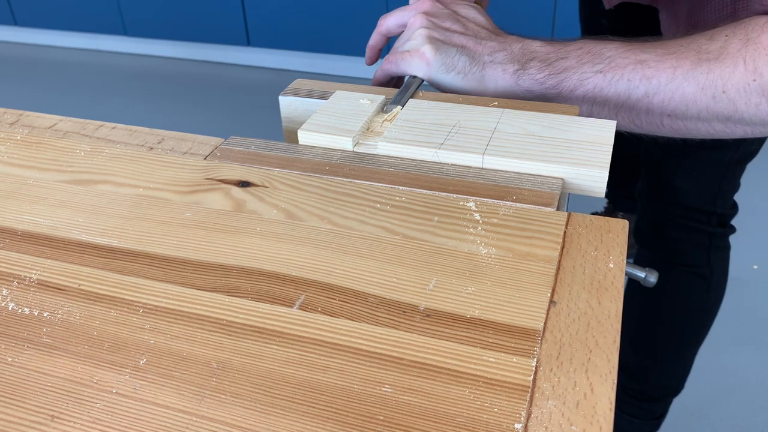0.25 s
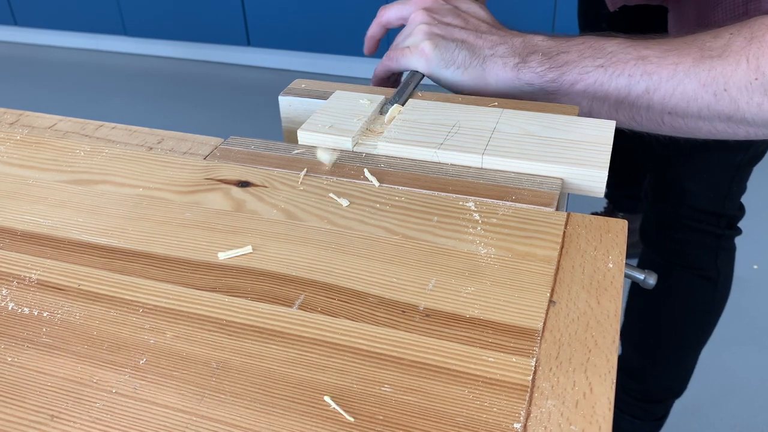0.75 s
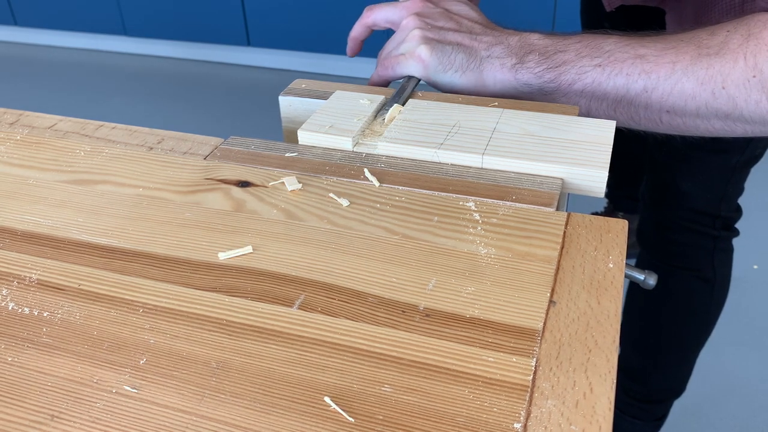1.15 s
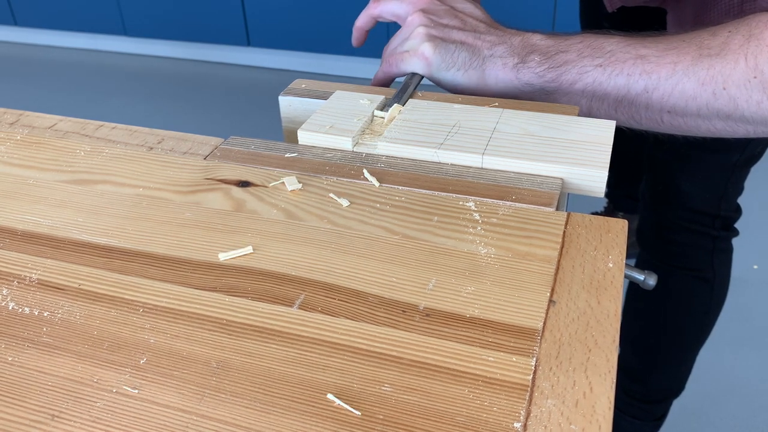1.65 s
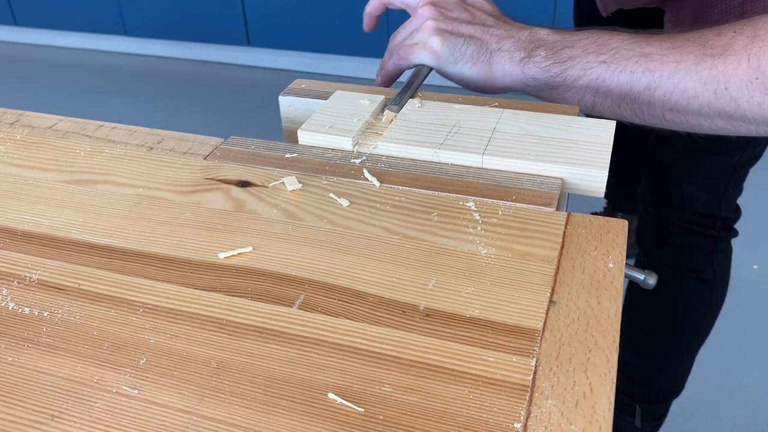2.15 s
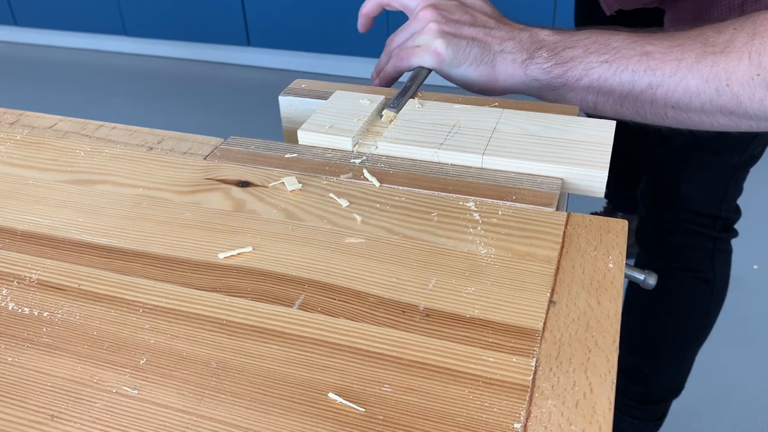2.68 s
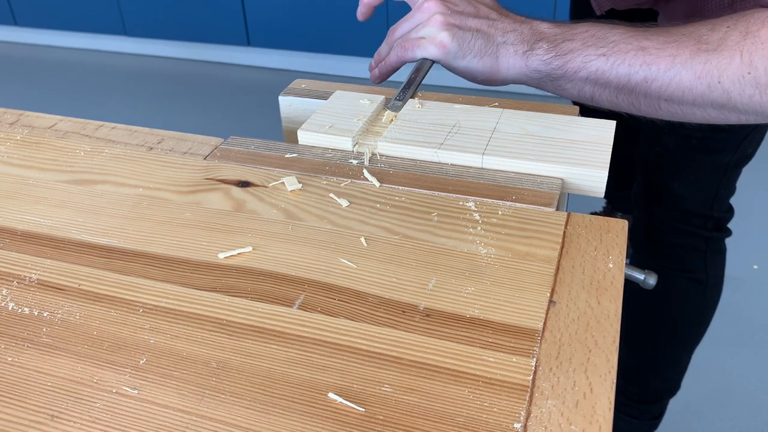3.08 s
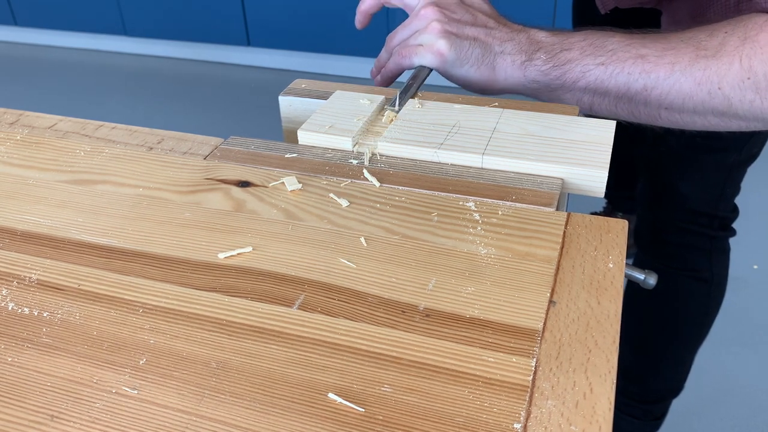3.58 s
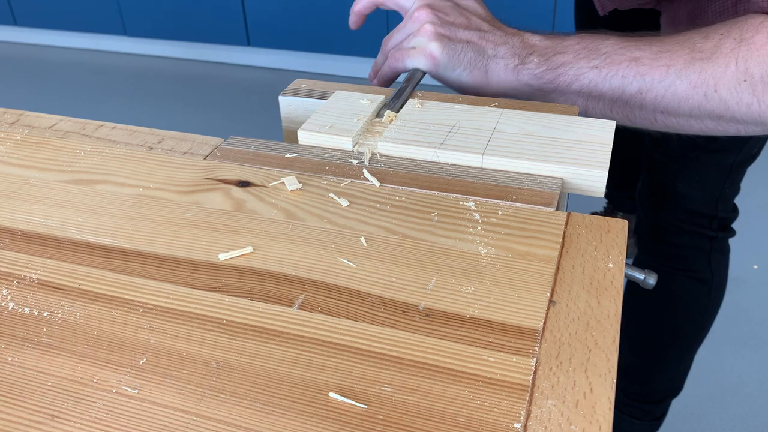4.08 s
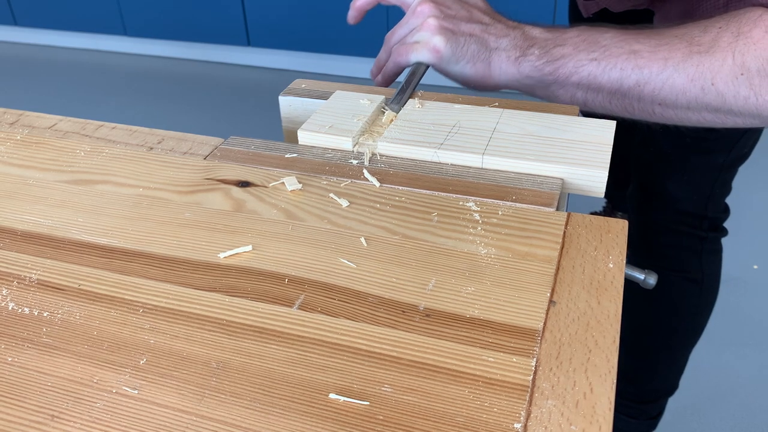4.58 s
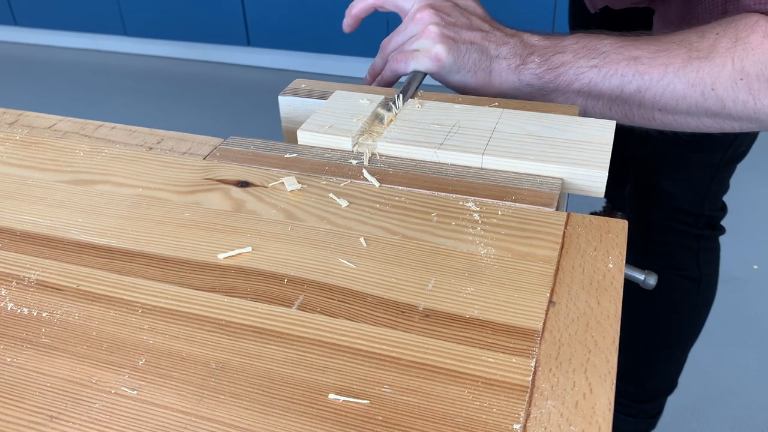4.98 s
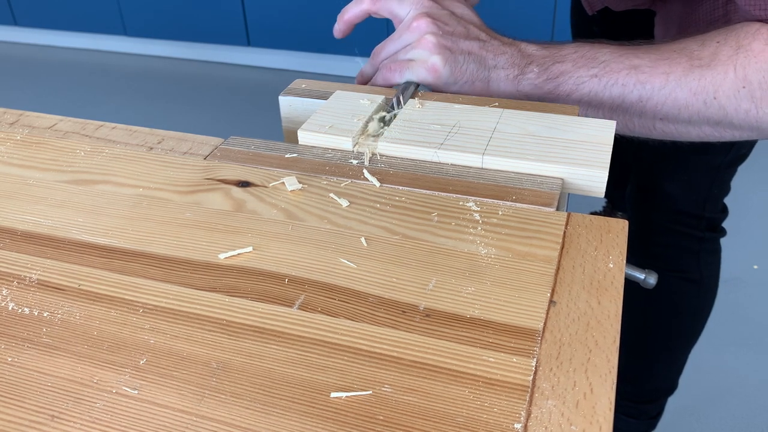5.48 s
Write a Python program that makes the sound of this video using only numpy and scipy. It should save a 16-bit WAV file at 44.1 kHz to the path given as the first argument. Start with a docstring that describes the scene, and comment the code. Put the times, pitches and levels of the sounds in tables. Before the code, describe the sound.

A hand chisel pares softwood in quick, crunchy scraping cuts with snapping fibres and soft bench thumps, pausing briefly before resuming, close and dry.

```python
"""A hand chisel pares a softwood block in a bench vice, heard in stereo close by on the bench (5.74 s).
Quick pushes tear fibres (grainy hiss), ring the block near 1.5 kHz and shake the bench top in low modes;
single fibres snap as clicked noise puffs. A squeak falls at 0.86 s and the hardest snap comes near 1.76 s.
After 3.0 s the tool nearly rests; from 3.55 s the cuts resume to the end, with a second squeak at 5.55 s.
A short decaying noise tail answers the tool as the room, over the steady shaped noise of quiet air."""
import sys
import numpy as np
from scipy import signal
from scipy.fft import rfft, irfft, next_fast_len
from scipy.io import wavfile
from scipy.ndimage import uniform_filter1d, map_coordinates

SR = 44100
rng = np.random.default_rng(int(sys.argv[2]) if len(sys.argv) > 2 else 0)


def persist_wave(psi):
    """Save psi, clipped to +-1, as 16-bit WAV."""
    counts = np.round(np.clip(psi, -1, 1) * 32767).astype(np.int16)
    wavfile.write(sys.argv[1], SR, np.atleast_2d(counts).T)


N = 253089


def chisel():
    """Source-filter principle: stick-slip cuts, slides and snaps excite block, blade and torn fibres."""
    # cuts, one row a push; levels are relative drives: [t/s, length/s, block level at the bite/dB,
    # block level at the break/dB, blade level above block/dB, tearing level above block/dB]
    cut_rows = [(0.052, 0.04, -42, -50, -13, -14), (0.145, 0.0061, -33, -16.5, -9, -12),
                (0.248, .022, -29, -42, -9, -16.5), (0.344, 0.024, -29.5, -19, -7.5, -1.5),
                (0.439, 0.028, -47, -26.5, -3.5, -8.5), (0.508, 0.075, -46, -20.5, -7.5, -11),
                (.688, .005, -30, -39, -17, -11.5), (0.722, 0.017, -30, -25, -22, -3.5),
                (.796, 0.028, -23, -23, -7, -14.5), (0.942, 0.046, -36.5, -32.5, -15, -10),
                (1.046, 0.0046, -30, -26, -6.5, -18), (1.217, .005, -29.5, -40, -20, -6),
                (1.273, 0.031, -37, -26.5, -1, -1.5), (1.395, 0.068, -40.5, -40, -7.5, -5),
                (1.489, 0.047, -31.5, -22.5, -2.5, 1), (1.617, 0.025, -36.5, -38.5, -4, -12.5),
                (1.716, 0.036, -42, -25.5, -4.5, -9), (1.755, 0.012, -10.5, -16, -22.5, -14),
                (1.865, 0.065, -45, -44.5, -31, -1.5), (2.131, .04, -29.5, -35.5, -7.5, -13.5),
                (2.234, 0.042, -36, -30, -7.5, -5), (2.373, 0.048, -30, -34.5, -12, -16),
                (2.47, 0.039, -29, -37.5, -10.5, -1.5), (2.627, 0.047, -72, -57, -11.5, 6),
                (2.763, 0.013, -43.5, -48.5, -6, -15), (2.892, 0.047, -55, -49.5, -3, 0.5),
                (2.958, .004, -29, -35.5, -5, -8), (2.986, .031, -48, -41, -6, -8),
                (3.551, 0.058, -37, -34.5, 0.5, -2), (3.673, 0.028, -38.5, -37.5, -4.5, -3),
                (3.77, 0.0185, -34, -35, -3, -3), (3.984, .056, -30.5, -29.5, -4.5, -5.5),
                (4.087, .048, -39, -35.5, -7, -4), (4.193, .068, -26.5, -29.5, -1.5, -9),
                (4.328, 0.045, -34.5, -33.5, -4, -4), (4.432, 0.0495, -24, -29, -6.5, -7),
                (4.576, 0.04, -32, -28, -12.5, -10), (4.665, 0.041, -34.5, -32, -4.5, -4),
                (4.911, .038, -50, -11, -10, -11.5), (4.968, .03, -23, -25.5, 0, 5),
                (5.034, 0.054, -47, -38, -8, 2.5), (5.139, 0.036, -47, -35, -1.5, -6),
                (5.188, 0.043, -15, -18.5, -7, 5), (5.307, 0.013, -48.5, -28.5, 7, 13.5),
                (5.408, 0.028, -17, -30.5, -4.5, -6.5), (5.539, 0.057, -48, -48, -5, -1.5),
                (5.609, 0.0043, -7, -19, -14, -25.5), (5.675, 0.033, -26.5, -23.5, -8.5, -9)]
    # light sliding of the blade on the wood between cuts: [t/s, block level/dB, tearing level/dB]
    slide_rows = [(0, -37, -43.5), (.19, -49, -72), (.55, -34.5, -49), (.78, -59, -48.5), (.9, -50, -51.5),
                  (1.3, -53, -65), (1.66, -50, -54.5), (2.05, -49, -55.5), (2.24, -76, -53.5),
                  (2.6, -45, -50.5), (2.97, -50.5, -55.5), (3.06, -68, -72.5), (3.25, -70.5, -71),
                  (3.55, -90, -86.5), (3.72, -71, -63), (4.0, -75, -90), (4.2, -51, -53.5), (4.9, -57, -66),
                  (5.1, -46, -55), (5.55, -43.5, -47.5), (5.74, -65, -64)]
    # snaps of single fibres, relative drives: [t/s, block level/dB, crack level above block/dB]
    snap_rows = [(0.1516, -21.5, -9.5), (0.3533, -15, -16), (0.3581, -10.5, -4), (0.3754, -26.5, 8),
                 (0.449, -22.5, -18), (0.5516, -26.5, -11), (0.5818, -17.5, -4.5), (0.5898, -20, 2),
                 (0.603, -18.5, -3), (0.7183, -31, -23), (0.808, -16, -12), (0.829, -21, -14),
                 (0.8428, -32.5, 7.5), (0.9725, -33.5, -16.5), (1.0068, -30.5, -31), (1.0513, -17.5, -13),
                 (1.092, -42, -1), (1.226, -40.5, 2.5), (1.287, -17, -6.5), (1.2956, -16.5, -5.5),
                 (1.306, -24, 3.5), (1.4176, -19, -10), (1.487, -15.5, -12), (1.5182, -12, -12),
                 (1.7208, -32, -12), (1.735, -20, -8), (1.7557, 0, -13), (1.7694, -10, -14),
                 (2.135, -25, -9), (2.146, -26.5, -15), (2.171, -28, -12.5), (2.2424, -26.5, -5),
                 (2.271, -24.5, -22.5), (2.334, -49.5, 5), (2.372, -22.5, -16), (2.3858, -27, -11),
                 (2.411, -28, -22), (2.468, -28.5, -8.5), (2.4883, -22.5, -2), (2.6701, -32, -2.5),
                 (2.752, -30, -20), (2.9559, -26, -22), (2.9875, -34.5, -20), (3, -29.5, -8),
                 (3.016, -25.5, -11), (3.278, -40.5, -23), (3.3494, -33.5, -3.5), (3.5833, -22.5, -15.5),
                 (3.6051, -20.5, -23), (3.7029, -26.5, -29), (3.79, -32.5, -12), (3.897, -33, -38),
                 (3.9856, -21, -24), (4.006, -24, -9), (4.0326, -22.5, -2), (4.0921, -27, -9),
                 (4.115, -29, -13), (4.138, -22, -23.5), (4.197, -28, -4.5), (4.211, -12.5, -10),
                 (4.2365, -8.5, -14), (4.2617, -9.5, -7.5), (4.4348, -27, -9.5), (4.4589, -26.5, 3.5),
                 (4.4844, -23, -8), (4.5069, -27, -3), (4.565, -35, -4), (4.586, -19.5, -14),
                 (4.603, -34.5, 2.5), (4.6274, -24.5, -10.5), (4.6683, -28, -6), (4.6878, -23, -14),
                 (4.7072, -24, -18), (4.916, -28, -3.5), (4.9288, -17.5, -12), (4.9479, -13, -34),
                 (4.9574, -20.5, 0), (5.0921, -23, -31), (5.1913, -18, -2), (5.3184, -39, 1),
                 (5.4088, -13.5, -18), (5.4202, -27.5, -11), (5.4388, -26.5, -24), (5.4635, -27, -17.5),
                 (5.5851, -29, -25), (5.6114, -19.5, -18.5), (5.6355, -39.5, 7), (5.6798, -25.5, -12.5)]
    # modes of the wood block: [f/Hz, width/Hz, relative level/dB]
    block_modes = [(606, 170, -9.5), (1118, 21, -1.5), (1369.5, 67, 6.5), (1523, 163, 6.5), (1655, 130, 7),
                   (1757, 51, 7.5), (1901, 43, 2.5)]
    # modes of the blade: [f/Hz, width/Hz, relative level/dB]
    blade_modes = [(2710, 172, 3), (3404, 150, 1), (3860, 82, -3.5), (4662, 310, -3)]
    # spectrum of the tearing fibres: [f/Hz, relative density level/dB]
    tearing_spectrum = [(2000, -24), (4000, -8), (5500, -2.5), (7000, -3.5), (7800, -9), (9000, -2),
                        (10500, 2), (11500, -6.5), (12400, 1), (14000, -2), (15600, -19), (15850, -14),
                        (16000, -35.5)]
    bite_db_per_s, let_go_db_per_s = 3501.5, 953  # start of every cut, decay of the block drive
    growth_db, tear_let_go_db_per_s = 4, 850  # blade and tearing gain on the block, then linger
    lift_s, lift_db, lift_db_per_s = 0.044, -2, 703  # the blade lifts just before each bite

    # force envelopes of the cuts
    s, length, bite_db, break_db, blade_db, tear_db = np.transpose(cut_rows)
    block = strokes(s, length, bite_db, break_db, bite_db_per_s, let_go_db_per_s)
    blade = strokes(s, length, bite_db + blade_db - growth_db, break_db + blade_db,
                    bite_db_per_s, tear_let_go_db_per_s)
    tear = strokes(s, length, bite_db + tear_db - growth_db, break_db + tear_db,
                   bite_db_per_s, tear_let_go_db_per_s)

    # sliding weakens while the blade is lifted
    lifted = strokes(s - lift_s, lift_s, lift_db, lift_db, lift_db_per_s, bite_db_per_s)
    slide, slide_tear = amp(curves(slide_rows)) / (1 + lifted)

    # stick-slip gives way to steady tearing in a thick shaving
    ticking = slips(rate=170, spread_db=2, t60=0.022, steady=0.6)
    flowing = np.clip(uniform_filter1d(tear, size=SR // 30) / amp(-15.5), 0, .85)
    slip = flowing + (1 - flowing) * ticking

    s, snap_db, crack_db = np.transpose(snap_rows)
    knock = bursts(s, snap_db + 6.5, t60=0.0073, rise=0.0011, click=1.64)
    crack = bursts(s, snap_db + crack_db + 2.5, t60=0.019, rise=0.00027, click=0.44)

    rubbed = (1.007 * block + slide) * slip * grains(2.8, 500)
    wood = filtered(patchy(rubbed, depth_db=4), resonant(block_modes))
    # a snap starts all modes in step: a hard attack, here without its bass
    in_step = resonant(block_modes, ratio=0.88)
    wood = wood + filtered(knock, lambda hz: in_step(hz) * (1j * hz / (1j * hz + 700)) ** 2)

    rasp = (0.75 * blade + 0.47 * slide + 0.23 * slide_tear) * slip * grains(1.5, 760)
    steel_drive = patchy(rasp, depth_db=2.5) + 0.27 * knock + 0.41 * crack
    steel = filtered(steel_drive, resonant(blade_modes))

    torn = (1.125 * tear + 2.5 * slide_tear) * slip * grains(1.2, 1200)
    fibres = filtered(patchy(torn, depth_db=5.5) + crack,
                      lambda hz: unit(amp(along(tearing_spectrum, hz))))

    wood_ports = ports(wood, 1.0, -0.000058, -.2)
    steel_ports = ports(steel, 0.16, -0.000073, -1.4)
    return wood_ports + steel_ports + ports(fibres, 0.64, 0.0002844, -.2)  # tearing comes from the right


def slips(rate, spread_db, t60, steady):
    """Stick-slip friction: random sudden rises, rate a second, decay over a steady share; rms 1."""
    sizes = amp(spread_db * np.minimum(rng.exponential(size=N), 2.5))
    kicks = (rng.random(N) < rate / SR) * sizes
    decay = amp(-60 * np.arange(SR // 20) / SR / t60)
    fading = signal.fftconvolve(kicks, decay)[:N]
    return unit(steady + unit(fading))


def patchy(x, depth_db):
    """Time-varying spectrum: a smooth random gain makes each moment favour other pitches."""
    z = signal.stft(x, nperseg=256)[2]
    field = uniform_filter1d(rng.standard_normal(z.shape[1:]), 3, axis=0)  # smooth over frequency
    field = uniform_filter1d(field, 8, axis=1)  # smooth over time
    gain = amp(depth_db * (unit(field) - 0.3 * depth_db))  # deeper patches are also softer
    return signal.istft(z * gain, nperseg=256)[1][:, :N]


def squeaks():
    """Frequency modulation: a rough tone glides down and settles, as a chip springs free."""
    # thin squeaks: [t/s, start f/Hz, end f/Hz, length/s, level/dB]
    squeak_rows = [(0.862, 15850, 10080, 0.019, -17), (5.553, 14560, 11900, 0.0078, -20)]
    track = np.zeros(N)
    for s, from_hz, to_hz, length, db in squeak_rows:
        u = np.arange(round(length * SR)) / (length * SR)
        glide = to_hz + (from_hz - to_hz) * (1 - u) ** 2
        hz = glide + 900 * rng.standard_normal(len(u))  # roughness
        tone = np.sin(2 * np.pi * np.cumsum(hz) / SR)
        track[round(s * SR):][:len(u)] += amp(db) * np.sin(np.pi * u) * tone
    return ports(np.array([track, track]), 1, 3.02e-4, 0)


def bench():
    """Forced vibration of a plate: a lumpy hand force and single soft jolts ring the bench-top modes."""
    # shoves by the hands, relative drives: [t/s, jolt level/dB, second mode level above first/dB,
    # rocking level/dB, upper modes level above rocking/dB]
    jolt_rows = [(.043, -13, 3, -41, -28), (0.107, -10, -2, -54, -10), (.156, -25, 13, -39, 12),
                 (0.261, -17, 4.5, -31, -4), (0.353, -19, 3, -27.5, 5.5), (.433, -19, 11, -29.5, -4),
                 (.505, -14, 6, -18, 3.5), (.61, -11, -12, -17, -7.5), (0.699, -44, -14, -36, -26),
                 (0.817, -37, -23, -31, 0), (0.985, -24, -3.5, -44.5, -3.5), (1.045, -25, -7, -42, 2),
                 (1.124, -39, 17, -31, -25), (1.305, -15.5, -4, -25.5, 0), (1.376, -25, 10.5, -47, -13),
                 (1.444, -15.5, 8.5, -22.5, -10), (1.521, -29, -9, -24, 5), (1.608, -9.5, -6, -26.5, 3.5),
                 (1.736, -29, 12, -31, 3), (1.971, -23, 4, -25, -8.5), (2.03, -36, -8, -33.5, -27),
                 (2.256, -45, -7, -36.5, 0), (2.487, -47, -8, -35.5, 0.5), (2.544, -26, -8, -35.5, -12),
                 (2.776, -27.5, -15, -40, 0), (3.295, -42.5, -32, -44.5, -4.5), (3.351, -51, -4, -55, 10.5),
                 (3.589, -19, -13, -28, -0.5), (3.781, -32, -1, -41.5, 8), (3.881, -15, -3, -32.5, -17),
                 (3.931, -32.5, 12, -39, -8), (4.019, -18.5, -25, -22, -5.5), (4.215, -25, -1, -31, 2.5),
                 (4.257, -20, -24, -30, -17), (4.486, -16.5, 7.5, -17, -7), (4.603, -27, -4, -32.5, -6),
                 (4.708, -28, 12, -29.5, -1.5), (4.834, -24, 0, -56, -24), (4.94, -36, -12, -21, 0),
                 (5.172, -16.5, -4, -23.5, -24), (5.234, -30, -3, -39, 3), (5.349, -53, -7, -62, -18),
                 (5.417, -18, -17, -37.5, 9.5), (5.67, -25, 3, -24.5, -3.5)]
    # trembling resting weight of the hands: [t/s, rocking level/dB]
    lean_rows = [(0, -22.5), (.6, -41), (1.0, -44.5), (1.6, -43), (2.2, -47.5), (2.9, -51), (3.25, -60.5),
                 (3.5, -62), (3.8, -48.5), (4.4, -39), (4.9, -47), (5.3, -37), (5.74, -40.5)]
    # low, middle and upper bench modes: [f/Hz, width/Hz, relative level/dB]
    low_modes = [(61.4, 12, -12), (104.7, 10.7, -1.5)]
    middle_modes = [(124.1, 6, -3.5), (180.7, 16.8, -1.5)]
    upper_modes = [(265.7, 36, -7), (335.7, 20, 0.5), (412.4, 59.4, 2.5), (643, 31, 5.5), (860, 330, -0.5)]
    shove_db_per_s, shove_s = 903.5, 0.016  # rise and hold of a shove
    rock_db_per_s, upper_db_per_s = 152, 238  # decays
    lean_upper_db = -1.5

    s, jolt_db, second_db, rock_db, up_db = np.transpose(jolt_rows)
    lean = amp(curves(lean_rows)[0])
    shake = lean + strokes(s, shove_s, rock_db, rock_db, shove_db_per_s, rock_db_per_s)
    upper_db = rock_db + up_db
    rattle = amp(lean_upper_db) * lean
    rattle = rattle + strokes(s, shove_s, upper_db, upper_db, shove_db_per_s, upper_db_per_s)
    first = bursts(s, jolt_db - 8.0, t60=0.077, rise=0.0032, click=16)
    second = bursts(s, jolt_db + second_db - 0.5, t60=0.032, rise=0.01, click=8.2)

    # the main mode keeps rocking, its pitch wandering at random
    lumps = wobble(25)
    phase = 2 * np.pi * np.cumsum(low_modes[-1][0] + 7 * wobble(14)) / SR
    rocking = shake * amp(1.8 * lumps) * np.array([np.sin(phase), np.cos(phase)])

    def soft(modes, ratio):
        """Low-pass contact: flesh dulls the force that drives the modes."""
        return lambda hz: resonant(modes, ratio)(hz) / (1 + 1j * hz / 700) ** 2

    low_force = 0.26 * shake * grains(0.4, 31, lumps) + first
    low = rocking + filtered(low_force, soft(low_modes, 0.73))
    # the whole bench sways, growing less than in proportion to the shaking
    sway = amp(-26.0) * shake ** 0.51 * grains(1.0, 38)
    low = low + filtered(sway, resonant(low_modes[:1]))
    middle_force = 0.59 * rattle * grains(0.5, 40, lumps) + second
    middle = filtered(middle_force, soft(middle_modes, -0.7))
    upper_force = 0.67 * rattle * grains(3.73, 45, lumps) + 0.045 * second
    upper = filtered(upper_force, soft(upper_modes, -0.58))

    low_ports = ports(low, 0.95, 0.000017, 0.67)
    middle_ports = ports(middle, 0.84, -0.00005, 0.68)
    return low_ports + middle_ports + ports(upper, 0.34, -0.00003, 2.3)


def walls(x):
    """Reverberation: convolution with noise in which each frequency decays at its own speed."""
    # reverberation time of the room: [f/Hz, t60/s]
    decay_times = [(150, .35), (1500, 0.21), (10000, 0.1)]
    hz, t, z = signal.stft(rng.standard_normal((2, SR // 2)), SR, nperseg=256)
    decay = amp(-60 * t / along(decay_times, hz)[:, None])
    tail = signal.istft(z * decay, SR, nperseg=256)[1]
    return signal.fftconvolve(x, tail / np.linalg.norm(tail[0]), axes=1)[:, :N]


def hush():
    """Stationary coloured noise: the steady air of the workshop."""
    # spectrum of the air: [f/Hz, relative density level/dB]
    air_spectrum = [(15, -33), (25, 3.5), (127, -8.5), (427, -19), (575, -32.5), (659, -17.5), (714, -24.5),
                    (1100, -29.5), (2220, -47), (3250, -30.5), (8590, -55.5), (10400, -49), (16000, -61)]
    noise = filtered(rng.standard_normal((2, N)), lambda hz: amp(along(air_spectrum, hz)))
    return amp(-60.0) * ports(unit(noise), 0.86, 0, .5)


def strokes(s, length, first_db, last_db, rise_db_per_s, fall_db_per_s):
    """Exponential envelopes, summed: a rise, a straight run in dB from first to last level, a fall."""
    gain, t = np.zeros(N), np.arange(N) / SR
    for start, run, a_db, b_db in np.broadcast(s, length, first_db, last_db):
        begin = max(0, round((start - 60 / rise_db_per_s) * SR))  # 60 dB below the stroke
        end = round((start + run + 60 / fall_db_per_s) * SR)
        u = t[begin:end] - start
        level = np.interp(u, [0, run], [a_db, b_db])
        level = level + rise_db_per_s * np.minimum(u, 0) - fall_db_per_s * np.maximum(u - run, 0)
        gain[begin:end] += amp(level)
    return gain


def bursts(times, levels_db, t60, rise, click):
    """Impulsive excitation: two tracks of decaying noise puffs; clicks open those of the first."""
    track, t = np.zeros((2, N + SR)), np.arange(SR // 10) / SR
    for s, db in zip(times, levels_db):
        envelope = amp(-60 * t / t60) * (1 - np.exp(-t / rise))
        puff = envelope * rng.standard_normal((2, len(t)))
        puff[0, 0] = click
        # a second click at a random delay gives each burst its own colour
        puff[0, rng.integers(8, 60)] += click * rng.uniform(-1.1, 1)
        start = round(s * SR)
        track[:, start:start + len(t)] += amp(db) * puff
    return track[:, :N]


def grains(rough_db, rate, shared=0):
    """Amplitude modulation: two noises torn by the same random grain envelope, rms 1 together."""
    envelope = amp(rough_db * (wobble(rate) + shared))
    return unit(envelope * rng.standard_normal((2, N)))


def resonant(modes, ratio=-1):
    """Modal superposition, causal and keeping white-noise rms; ratio scales each mode on the last."""
    def shape(f):
        """Sum of damped second-order resonances; a positive ratio leaves dips between them."""
        return sum(ratio ** k * amp(db) * 1j * f * w / (c * c - f * f + 1j * f * w)
                   for k, (c, w, db) in enumerate(modes))
    return lambda f: shape(f) / np.sqrt(np.mean(abs(shape(f)) ** 2))


def ports(pair, alike, left_lag_s, left_lean_db):
    """Interaural cues: mix two unrelated tracks to stereo of given likeness, left lag and balance."""
    turn = np.arccos(np.clip(alike, -1, 1)) / 2
    both = np.cos(turn) * pair[0] + np.sin(turn) * np.array([pair[1], -pair[1]])
    side = np.array([[.5], [-.5]])  # left, right
    return filtered(both, lambda hz: amp(left_lean_db * side)
                    * np.exp(-2j * np.pi * hz * left_lag_s * side))


def filtered(x, response):
    """Linear filtering: x times a complex response of frequency, zero-padded."""
    m = next_fast_len(N + SR // 2)
    return irfft(rfft(x, m) * response(np.fft.rfftfreq(m, 1 / SR)), m)[..., :N]


def wobble(rate):
    """Band-limited fluctuation: a smooth random curve with rate knots a second."""
    knots = rng.standard_normal(int(N * rate / SR) + 4)
    return map_coordinates(knots, [np.arange(N) * rate / SR])


def curves(rows):
    """Linear interpolation in time: one value per sample for each column after the time."""
    s, *cols = np.transpose(rows)
    return np.array([np.interp(np.arange(N) / SR, s, c) for c in cols])


def along(points, hz):
    """Logarithmic frequency scale: interpolate (f/Hz, value) points at hz."""
    f, v = np.transpose(points)
    return np.interp(np.log(hz + 1), np.log(f + 1), v)


def unit(x):
    """Power normalisation: x at rms 1."""
    return x / np.sqrt(np.mean(x ** 2) + 1e-20)


def amp(db):
    """Logarithmic level: decibels to amplitude gain."""
    return 10 ** (np.asarray(db) / 20)


def scene():
    """Superposition: the tool with its room, the bench and the air."""
    tool = chisel() + squeaks()
    return tool + amp(-12.0) * walls(tool) + bench() + hush()


def record(dry):
    """Transducer limits: high-pass against deep bass, saturation of loud peaks, a sharp band limit."""
    top_hz = 16532
    thin = filtered(dry, lambda hz: (1j * hz / (1j * hz + 40)) ** 2)
    rounded = thin / (1 + abs(thin / .9) ** 6) ** (1 / 6)
    return filtered(rounded, lambda hz: hz < top_hz)


dry = scene()
out = record(dry)
persist_wave(out)
```